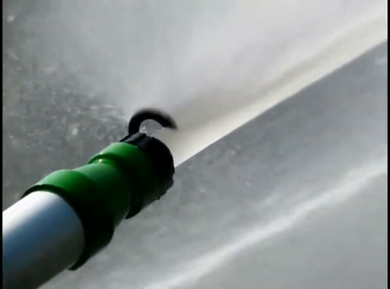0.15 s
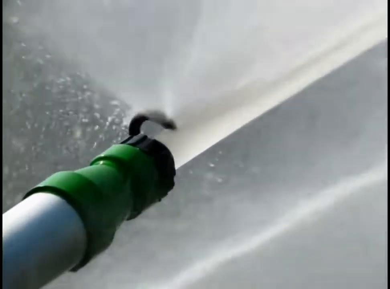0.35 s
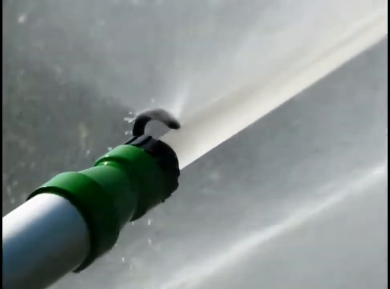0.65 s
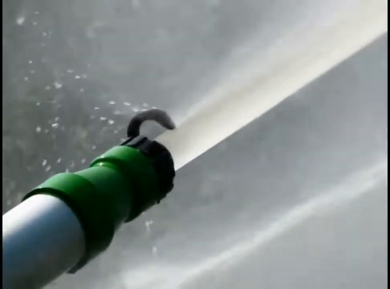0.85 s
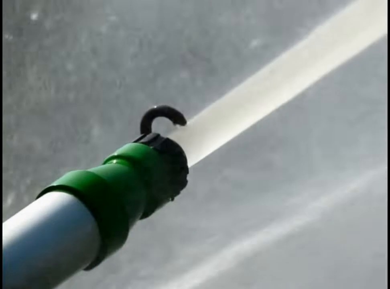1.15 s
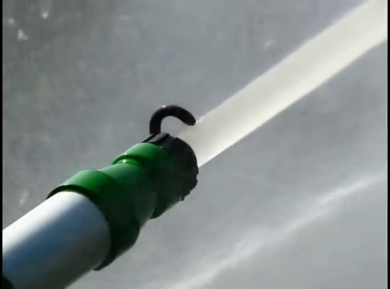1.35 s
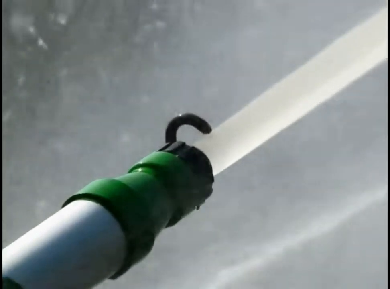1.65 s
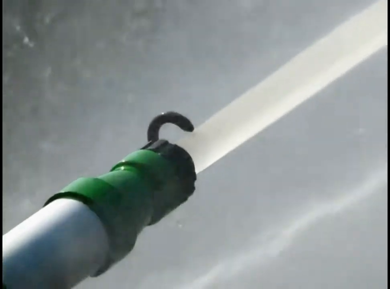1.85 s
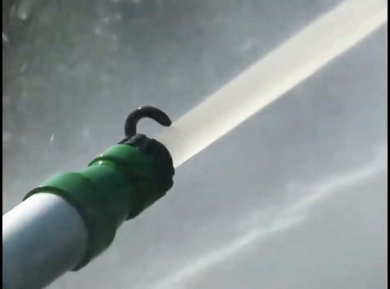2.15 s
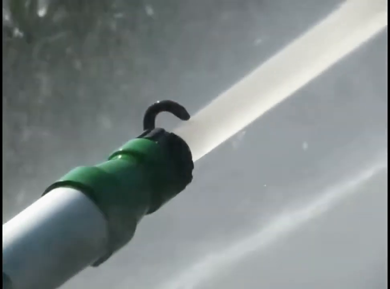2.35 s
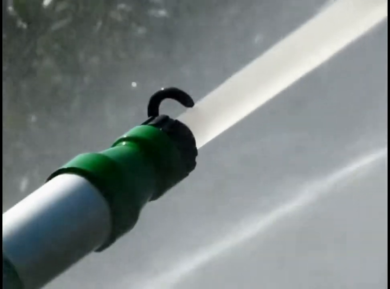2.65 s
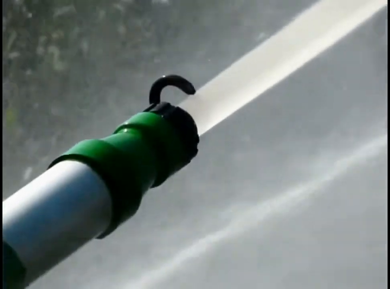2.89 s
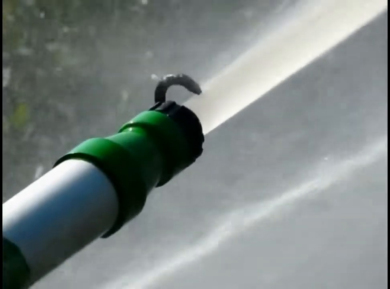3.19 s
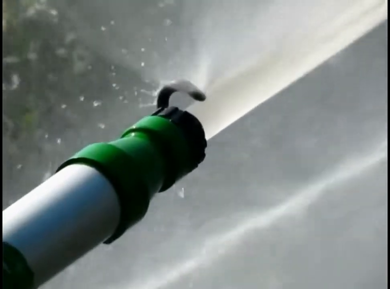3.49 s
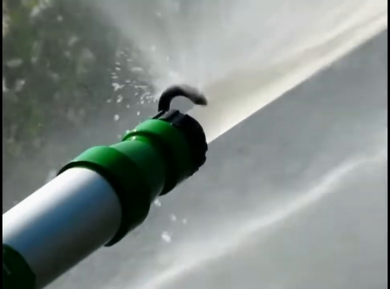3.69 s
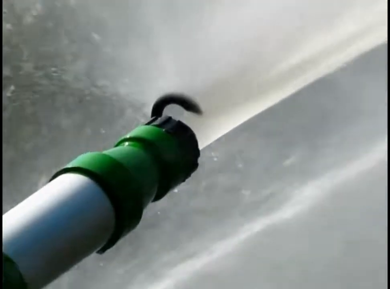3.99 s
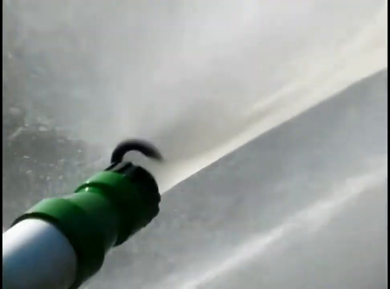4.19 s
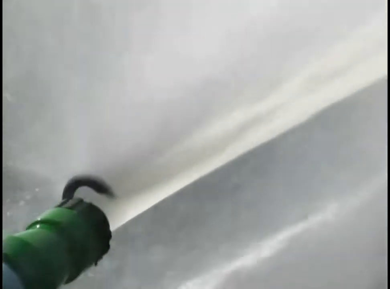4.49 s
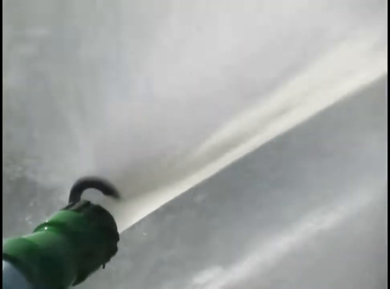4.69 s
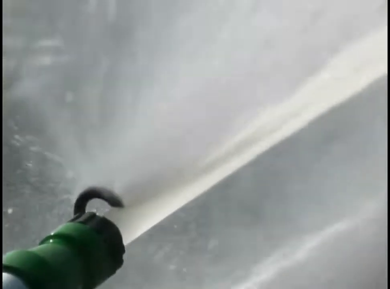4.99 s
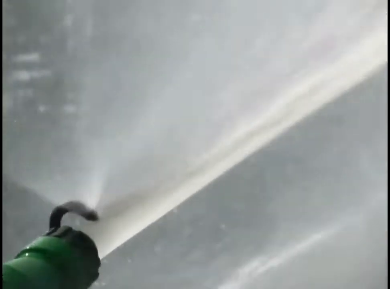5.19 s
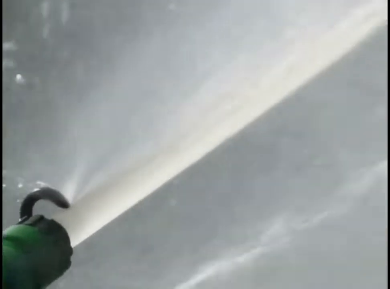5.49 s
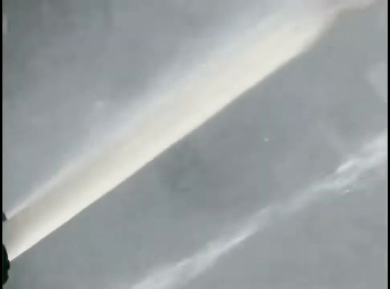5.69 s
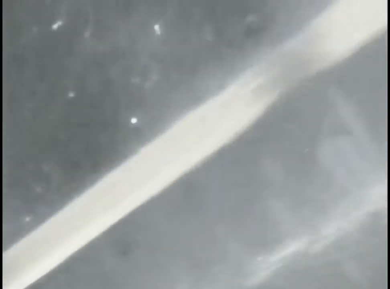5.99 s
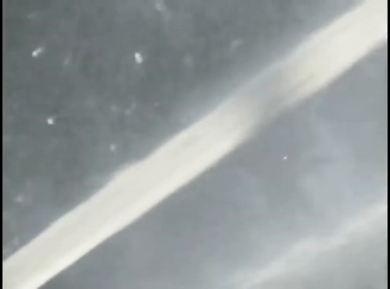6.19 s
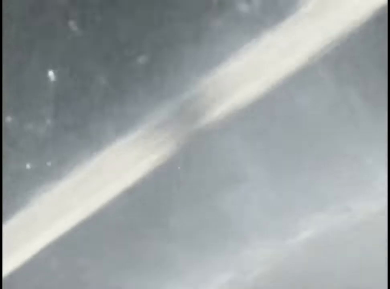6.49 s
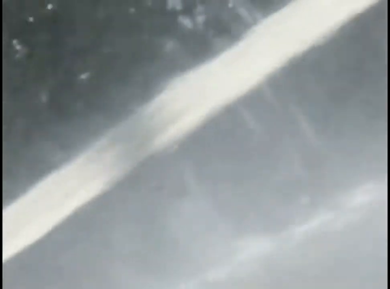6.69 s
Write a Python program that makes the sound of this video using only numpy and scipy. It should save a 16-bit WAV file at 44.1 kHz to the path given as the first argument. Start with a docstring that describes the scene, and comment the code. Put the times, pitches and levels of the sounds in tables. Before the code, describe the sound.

A pressurised water jet heard right at the nozzle, in the open under trees. It starts as an even fan of spray with low pipe rumble, swells into a crackling, fluttering rush with a metallic tubular colour, drops abruptly to a quieter hiss, then surges again rougher and fuller, while stray drops click nearby. Continuous wide noise, no silence.

```python
"""Under trees, right beside the nozzle of a rain gun that throws a high-pressure jet of water.
While the breaker hook dips in, the water fans out in a smooth hiss; set free, it sputters and rings in the barrel.
Both are filtered noise with crackle and bubble fizz, split into drop sizes that surge by chance.
Low noise makes the rumble in the pipe and the stirring air; short fading tones make the stray drops.
A hollow note, noise through one broad resonance, swells once."""
import sys
import numpy as np
from scipy import signal
from scipy.fft import rfft, irfft, next_fast_len
from scipy.io import wavfile
from scipy.ndimage import uniform_filter1d

SR = 44100
rng = np.random.default_rng(int(sys.argv[2]) if len(sys.argv) > 2 else 0)


def to_wav(s):
    """Save 16-bit WAV."""
    ch = np.atleast_2d(s).T  # columns
    pcm = np.round(np.clip(ch, -1, 1) * 32767)  # PCM
    wavfile.write(sys.argv[1], SR, pcm.astype(np.int16))


N = 302085
SIZE = next_fast_len(N + 4096, True)  # transform length, with spare room at the end
HZ = np.maximum(np.arange(SIZE // 2 + 1) * SR / SIZE, 1)  # frequency of every bin
T = np.arange(N) / SR  # time of every sample, s
LEFT_RIGHT = np.array([[1], [-1]])


def from_db(db):
    """Decibels to gain."""
    return 10 ** (np.asarray(db) / 20)


def rms_one(x):
    """Scale so that the middle of the channels has rms 1."""
    middle = np.atleast_2d(x).mean(axis=0)
    return x / np.sqrt(np.mean(middle ** 2) + 1e-20)


def in_time(rows):
    """Draw each column of a table over time as a curve with a value at every sample."""
    s, *columns = np.transpose(rows)
    return [np.interp(T, s, column) for column in columns]


def in_hz(points):
    """Read a table over frequency at every bin, in straight lines over log frequency."""
    hz, values = np.transpose(points)
    return np.interp(np.log(HZ), np.log(hz), values)


def drift(rate):
    """Slow chance with spread 1, changing about rate times a second."""
    step = 40  # samples between the points that are joined by straight lines
    pole = np.exp(-2 * step * np.pi * rate / SR)
    noise = rng.standard_normal(N // step + 2002)
    slow = signal.lfilter([1], [1, -2 * pole, pole * pole], noise)[2000:]  # skip the start-up
    return np.interp(np.arange(N) / step, np.arange(len(slow)), rms_one(slow))


def bell(centre_s, length_s):
    """Smooth rise and fall; length_s is the full width where it is down to 1/e."""
    return np.exp(-np.minimum((2 * (T - centre_s) / length_s) ** 2, 20))


def fading_hits(energies, die_s):
    """Sudden hits whose energy dies away by 1/e in die_s, as an amplitude."""
    return np.sqrt(signal.lfilter([1], [1, -np.exp(-1 / (die_s * SR))], energies + 1e-18))


# How alike the noise is at left and right: (f/Hz, correlation)
LIKENESS = [(40, .4), (80, 0.91), (150, 1), (330, 0.84), (560, 0.71), (1400, 0.47), (2400, 0.3),
            (4000, 0.14), (5700, 0.49), (8300, 0.49), (10000, 0.22), (12000, .34), (15500, .25)]
# How far the left side is ahead of the right: (f/Hz, phase/radians)
LEFT_LEAD = [(100, -0.47), (900, -0.35), (2500, 0.16), (5000, 0.0043), (7500, -0.85), (9500, -0.54),
             (11200, -1.7), (12600, -2.1), (14500, -0.71)]


def at_ports(mid, side):
    """Left and right spectra: a shared sound plus one of opposite sign, mixed to set their likeness."""
    alike = np.clip(in_hz(LIKENESS), -.99, .99)
    shared = np.sqrt(1 + alike) * rfft(mid, SIZE)
    opposed = np.sqrt(1 - alike) * rfft(side, SIZE) * LEFT_RIGHT
    return (shared + opposed) * np.exp(.5j * in_hz(LEFT_LEAD) * LEFT_RIGHT)


def band(spectrum, low_hz, high_hz):
    """One stretch of a spectrum as sound of rms 1."""
    edges = 1 / ((1 + (low_hz / HZ) ** 12) * (1 + (HZ / high_hz) ** 12))
    return rms_one(irfft(spectrum * edges, SIZE)[:, :N])


def spits(per_s, spread_db, die_s):
    """Tiny spits of water at random moments: many weak, a few strong, each gone in a flash."""
    sizes = from_db(spread_db * np.minimum(rng.exponential(1, N), 3.5))
    starts = sizes * (rng.random(N) < per_s / SR)
    return rms_one(fading_hits(starts ** 2, die_s))


def bubbles(per_s, cycles, spread_db):
    """Fizz of air torn into the water: each bubble rings briefly at its own slightly rising pitch."""
    draws = rng.random((20000, 4))[:int(min(per_s * N / SR, 20000))]
    when, size, strength, phase = draws.T[:, :, None]
    hz = 1200 * (14000 / 1200) ** np.sqrt(size)
    t = np.arange(900) / SR  # rings are cut off here, at about 20 ms
    age = t * hz / cycles  # 1 when the ring has faded by 60 dB
    height = np.sqrt(hz) * from_db(spread_db * np.minimum(-np.log(1 - strength), 3))
    turns = phase + hz * t * (1 + 0.0099 * np.minimum(age, 1))
    rings = height * np.exp(-np.log(1000) * age) * np.sin(2 * np.pi * turns)
    at = (when * N).astype(int) + np.arange(len(t))
    return rms_one(np.bincount(at.ravel(), rings.ravel(), N)[:N])


def puffs(per_s, die_s):
    """Slugs tear off at random: each swells at once and dies away around a steady mean flow; spread 1."""
    starts = rng.exponential(1, N) * (rng.random(N) < per_s / SR)
    swell = fading_hits(starts, die_s)
    return rms_one(swell - uniform_filter1d(swell, size=SR // 8))


# Tones at which the barrel rings: (f/Hz, width/Hz, level/dB against the direct sound at coupling 1)
BARREL = [(344, 19, 1.5), (560, 30, -5.5), (801, 65, 5.5), (967, 33, 5), (1070, 15, 3.5), (1176, 16.4, 9),
          (1270, 12, -13.5), (1498, 54, -4), (1623, 52, 2), (1800, 45, -9), (2026, 22, 5.5), (2064, 24, 2),
          (2595, 20, 5), (2920, 43, -4), (3066, 16, -2), (3307, 33, -0.5), (3515, 20, 2.5), (3714, 15, 1.5),
          (4105, 50, -3.5), (4500, 25, 1.5), (4940, 17, 1.5)]


def barrel(coupling):
    """Direct sound plus the barrel's resonances, each ringing in a narrow range of pitch."""
    ringing = 0
    for hz, width, db in BARREL:
        ringing = ringing + from_db(db) / (1 + 1j * hz / width * (HZ / hz - hz / HZ))
    return 1 + coupling * ringing


def spray(colour, balance, coupling, crackle, fizz):
    """Turbulent noise that crackles as threads of water snap, with fizz, coloured by the barrel."""
    mid, side = rng.standard_normal((2, N)) * np.sqrt(1 + crackle ** 2)
    tone = from_db(in_hz(colour) + in_hz(balance) * LEFT_RIGHT / 2)
    return at_ports(mid + fizz, side) * barrel(coupling) * tone


# Colour of the fanned spray before the barrel: (f/Hz, relative level/dB per Hz)
FAN = [(200, -15), (330, -15), (430, -7.5), (610, -3), (740, -9), (1200, -4.5), (1800, -2.5), (2600, 0.5),
       (4900, -7), (6500, -3.5), (8100, 0), (9600, -3.5), (12600, -6), (15800, -10.5)]
# Left minus right of the fan: (f/Hz, level/dB)
FAN_SIDE = [(60, -0.5), (110, -1.0), (200, -18), (380, -2.0), (700, -2), (1290, -4), (2380, -4.5),
            (4400, 0), (8120, 0.5), (15000, -1.5)]


def fan_spray(fizz):
    """Water spread by the hook: dense, even spits and less of the barrel make a smooth hiss."""
    crackle = from_db(-3) * spits(per_s=2100, spread_db=1.5, die_s=.00022)
    return spray(FAN, FAN_SIDE, coupling=0.37, crackle=crackle, fizz=fizz)


# The water: (t/s, level/dB of its hiss before drop sizes and mix, coarseness/dB: big slugs over droplets)
WATER = [(0, -27, -0.5), (0.7, -27.5, 0.5), (1.1, -26, 0.5), (1.25, -23, -3), (2.0, -22, -5.5),
         (2.9, -23.5, -2), (3.3, -26, -3), (3.45, -33, -6.5), (3.6, -36.5, 1.5), (4.5, -33, 3),
         (4.98, -29.5, 2), (5.06, -26, 1.5), (5.17, -25, 6.5), (5.5, -25.5, 5), (5.9, -25.5, 6),
         (6.2, -24.5, 6), (6.6, -25.5, 3), (6.85, -26, -5)]
# Drop sizes, from big slugs (gurgle, roar) over rush and hiss to fine mist:
# (low f/Hz, high f/Hz, level/dB, gain in the free jet/dB, share of coarseness, share in the common surge)
DROP_SIZES = [(298, 697, -18.5, -2.5, 0.89, 1.0), (708, 1356, -13.5, 0.5, 1.0, 1.0),
              (1286, 3350, -6, 2, 0.47, 0.74), (3357, 8900, 0, 0, 0.01, 0.51),
              (9460, 15800, -3.5, -1.84, -0.17, 0.57)]
FAN_SPUTTER_DB, JET_SPUTTER_DB = 0.43, 1.16  # dB for each unit of puffing
JET_WAVER_DB, WAVERS_PER_S = 0.5, 10.6  # spread and rough rate of the free jet's slower unsteadiness


def water():
    """Fan and free jet trade places as the hook moves; slugs tearing off make the jet sputter."""
    hiss_db, coarse_db = in_time(WATER)
    free = free_share()
    sputter_db = FAN_SPUTTER_DB * (1 - free) + JET_SPUTTER_DB * free
    fizz = from_db(-8.5) * bubbles(per_s=900, cycles=170, spread_db=0.9)
    fan, jet = fan_spray(fizz), jet_spray(fizz)
    surge = puffs(per_s=120, die_s=0.0034)  # shared by all drop sizes
    waver_db = JET_WAVER_DB * free * drift(WAVERS_PER_S)
    out = 0
    for low_hz, high_hz, size_db, free_db, coarse_share, shake in DROP_SIZES:
        fan_part = np.sqrt(1 - free) * band(fan, low_hz, high_hz)
        jet_part = np.sqrt(free) * band(jet, low_hz, high_hz)
        level_db = hiss_db + size_db + free_db * free + coarse_share * coarse_db
        level_db = level_db + gushes(np.sqrt(low_hz * high_hz)) + waver_db
        # each size of drop also puffs on its own
        puffing = shake * surge + 0.47 * puffs(per_s=210, die_s=0.012)
        out = out + (fan_part + jet_part) * from_db(level_db + sputter_db * puffing)
    return out


def rumble(colour, lumpy_db):
    """Low, lumpy turbulence of rms 1."""
    spectrum = at_ports(*rng.standard_normal((2, N))) * from_db(in_hz(colour))
    noise = irfft(spectrum, SIZE)[:, :N]
    return rms_one(noise * from_db(lumpy_db * drift(5.9)))


# Loudness of the water rumbling in the pipe: (t/s, level/dB)
PIPE = [(0, -52.5), (0.7, -50), (1.22, -45), (1.38, -54), (2.9, -57.5), (3.4, -64), (5.15, -54.5),
        (5.55, -57), (6.85, -58)]
# Colour of the pipe flow: (f/Hz, relative level/dB per Hz)
FLOW = [(70, -40), (120, -8), (175, -2.5), (220, -2.5), (275, -7), (340, -1.5), (480, -29)]


def pipe_flow():
    """Water rumbling in the pipe: low turbulent noise."""
    flow_db, = in_time(PIPE)
    return from_db(flow_db) * rumble(FLOW, lumpy_db=1.5)


# Colour of the moving air: (f/Hz, relative level/dB per Hz)
AIR = [(15, -12), (35, -3), (55, -4), (69, 0), (82, -4), (110, -6.5), (190, -22)]
AIR_DB, AIR_FOLLOWS = -64.2, 1.0  # mean level, share of the pipe's swing


def dragged_air():
    """Air dragged along: very low turbulent noise that rises and falls with the pipe flow."""
    flow_db, = in_time(PIPE)
    air_db = AIR_DB + AIR_FOLLOWS * (flow_db - flow_db.mean())
    return from_db(air_db) * rumble(AIR, lumpy_db=1.0)


def drop_ticks(rows):
    """Each drop is one short tone that dies away within a few milliseconds, with the bass thinned out."""
    out, t = np.zeros((2, N)), np.arange(SR // 50) / SR
    for s, peak_db, hz, t60, pan_db in rows:
        at = round(s * SR)
        tick = np.sin(2 * np.pi * hz * t) * np.exp(-np.log(1000) * t / t60)
        gain = from_db(peak_db + pan_db * LEFT_RIGHT / 2)
        out[:, at:at + len(t)] += tick / np.abs(tick).max() * gain
    return signal.sosfilt(signal.butter(1, 600, "high", fs=SR, output="sos"), out)


SPECKS_PER_S, SPECK_DB, SPECK_SPREAD_DB = 6, 14, 2  # rate, peak over WATER's level before mixing, spread +-
SPECK_HZ, SPECK_T60_S = 5000, 0.002  # middle pitch, time to fade by 60 dB


def random_drops():
    """Stray drops land at random, louder when the spray is, within half an octave of one pitch."""
    when, size, pitch = rng.random((int(SPECKS_PER_S * N / SR), 3)).T
    s = when * (N / SR - .03)
    hiss_db = np.interp(s, *np.transpose(WATER)[:2])
    peak_db = hiss_db + SPECK_DB + SPECK_SPREAD_DB * (2 * size - 1)
    hz = SPECK_HZ * 2 ** (pitch - .5)
    return drop_ticks([(at, db, f, SPECK_T60_S, 0) for at, db, f in zip(s, peak_db, hz)])


# Short swells of the spray, each strongest near one pitch: (t/s, swell level/dB, length/s, strongest f/Hz)
GUSHES = [(1.18, 3.5, 0.086, 352), (1.264, 4, 0.071, 11000), (1.318, 6.5, 0.039, 1500),
          (1.497, 1.5, 0.071, 900), (1.69, 3, 0.06, 8000), (1.765, 2.5, 0.04, 2500),
          (2.064, 2, 0.073, 6000), (2.21, 3, 0.07, 2000), (2.427, 2.5, 0.1, 1200),
          (2.656, 3.5, 0.053, 2000), (2.834, 6, 0.14, 500), (3.02, 2.5, 0.07, 5000), (3.206, 5, 0.046, 700),
          (5.165, 3, 0.041, 1500), (5.3, 3, 0.14, 600), (5.397, 2, 0.034, 8000), (6.034, 4, 0.079, 7000),
          (6.257, 2.5, 0.18, 2000), (6.56, 3, 0.041, 5000), (6.73, 3.5, 0.073, 5500)]
GUSH_OCTAVES = 1.68  # how far a gush spreads in pitch


def gushes(hz):
    """Swell in dB near one pitch: each gush rises and falls as a bell."""
    swell_db = 0
    for s, db, length, centre_hz in GUSHES:
        nearness = np.exp(-(np.log2(hz / centre_hz) / GUSH_OCTAVES) ** 2)
        swell_db = swell_db + db * nearness * bell(s, length)
    return swell_db


# When the jet runs free: (clears the hook t/s, meets it again t/s)
FREE_RUNS = [(1.25, 3.4), (4.99, 7.0)]
CLEAR_S, DIP_S = 0.053, 0.026  # how gradually the hook leaves the water and cuts back in


def free_share():
    """Share of the jet that runs free of the hook, 0-1, with soft changes."""
    share = 0
    for clears, meets in FREE_RUNS:
        cleared = (1 + np.tanh((T - clears) / (2 * CLEAR_S))) / 2
        not_met = (1 + np.tanh((meets - T) / (2 * DIP_S))) / 2
        share = share + cleared * not_met
    return np.clip(share, 0, 1)


# Colour of the free jet before the barrel: (f/Hz, relative level/dB per Hz)
JET = [(200, -23), (330, -20), (480, -13.5), (720, -14.5), (1100, -10), (1550, -2.5), (2100, 0), (2900, 2),
       (4300, -3.5), (6000, -1), (8500, -0.5), (10500, -7.5), (14000, -10.5), (15800, -12)]
# Left minus right of the free jet: (f/Hz, level/dB)
JET_SIDE = [(60, 0.0), (110, -0.5), (200, -3), (380, -0.5), (700, -3), (1290, -2.5), (2380, -5.5),
            (4400, -1.5), (8120, 0), (15000, -0.5)]


def jet_spray(fizz):
    """The free jet tears apart: fewer, shorter, more uneven spits ring strongly in the barrel."""
    crackle = from_db(-7.0) * spits(per_s=1400, spread_db=7.5, die_s=0.0001)
    return spray(JET, JET_SIDE, coupling=0.92, crackle=crackle, fizz=fizz)


HOLLOW_S, HOLLOW_LENGTH_S, HOLLOW_DB = 4.42, 0.73, -48  # middle of the swell, its length, level at its top
HOLLOW_HZ, HOLLOW_WIDTH_HZ = 570, 130


def hollow():
    """Hollow note while the hook is in the jet: turbulence in one broad resonance swells and fades."""
    resonance = 1 / (1 + 1j * HOLLOW_HZ / HOLLOW_WIDTH_HZ * (HZ / HOLLOW_HZ - HOLLOW_HZ / HZ))
    noise = at_ports(*rng.standard_normal((2, N)))
    note = band(noise * resonance, low_hz=400, high_hz=804)
    return from_db(HOLLOW_DB) * bell(HOLLOW_S, HOLLOW_LENGTH_S) * note


# Stray drops landing close by:
# (t/s, peak level/dB before thinning and mixing, f/Hz, time to fade by 60 dB/s, left minus right level/dB)
CLOSE_DROPS = [(4.742, -8, 8500, .004, 0), (4.907, -11, 2800, .003, 0), (5.175, -6.5, 1420, 0.0057, -16),
               (5.289, -3, 4900, 0.0035, -2), (5.311, -8.5, 1410, 0.0039, -2), (5.336, -3, 5500, 0.0018, 0),
               (5.422, -1.5, 4540, .003, -6), (5.823, -5, 4500, .002, 0), (6.079, -6, 4500, 0.0028, 0)]


def close_drops():
    """Stray drops tick at set moments, with a given pitch and left-right level."""
    return drop_ticks(CLOSE_DROPS)


def scene():
    """Water, pipe flow, air and drops in the open."""
    spraying = from_db(-1.49) * water()
    drops = from_db(-2.5) * (random_drops() + close_drops())
    return spraying + pipe_flow() + dragged_air() + drops + hollow()


PEAK_LIMIT, CUTOFF_HZ = 0.85, 15900  # where peaks level off before the cut, middle of the treble cut


def record(dry):
    """Round the very highest peaks, then cut the top steeply."""
    rounded = dry / (1 + (dry / PEAK_LIMIT) ** 4) ** .25
    keep = np.clip((CUTOFF_HZ - HZ) / 100 + .5, 0, 1)  # slopes down over 100 Hz
    return irfft(rfft(rounded, SIZE) * keep, SIZE)[:, :N]


dry = scene()
out = record(dry)
to_wav(out)
```